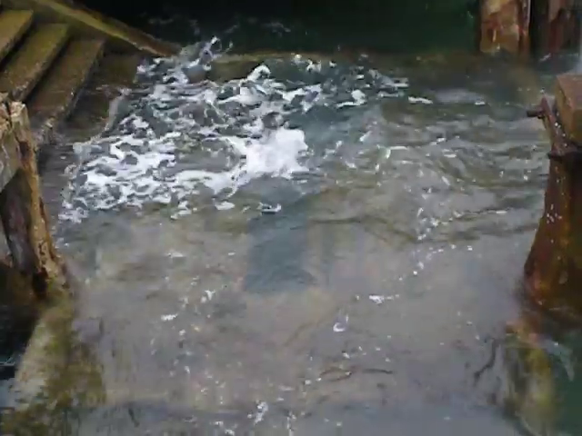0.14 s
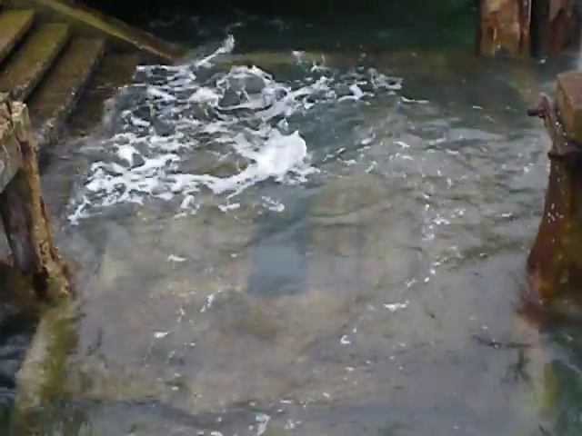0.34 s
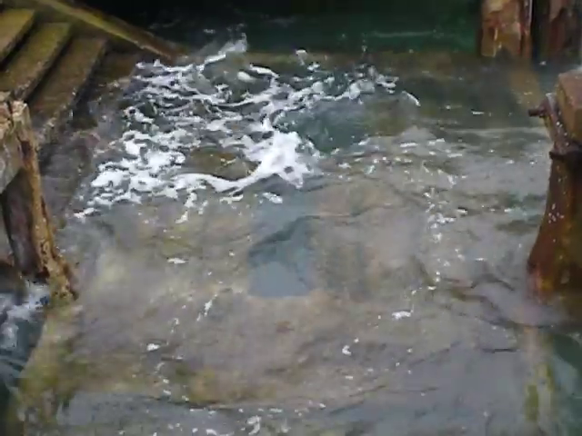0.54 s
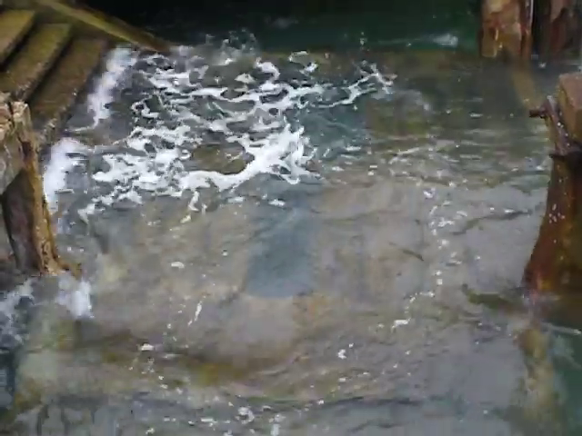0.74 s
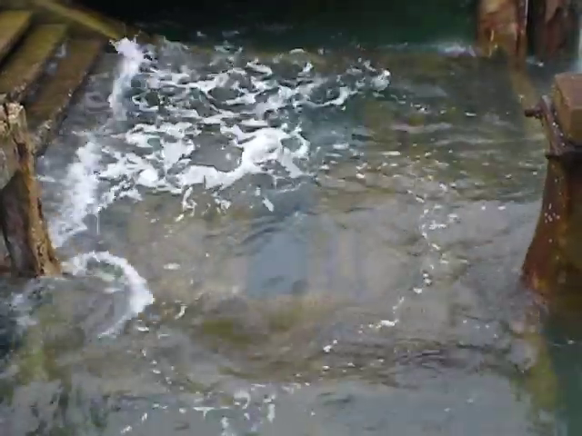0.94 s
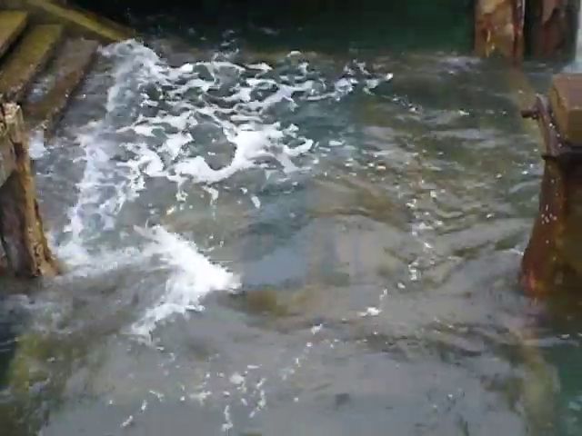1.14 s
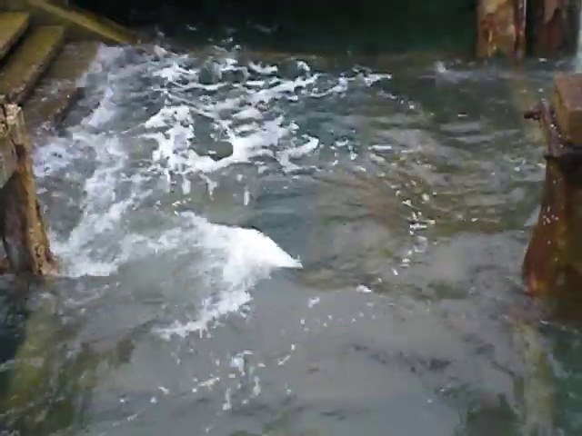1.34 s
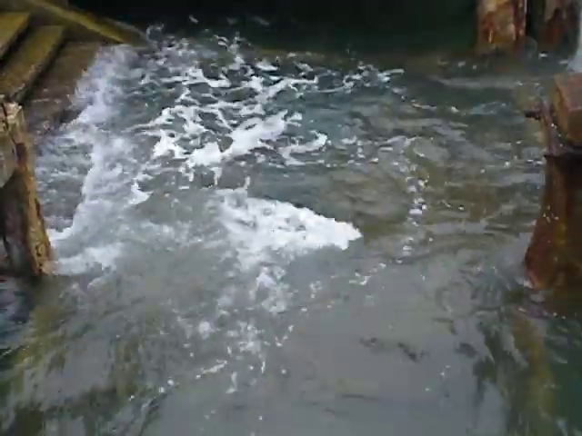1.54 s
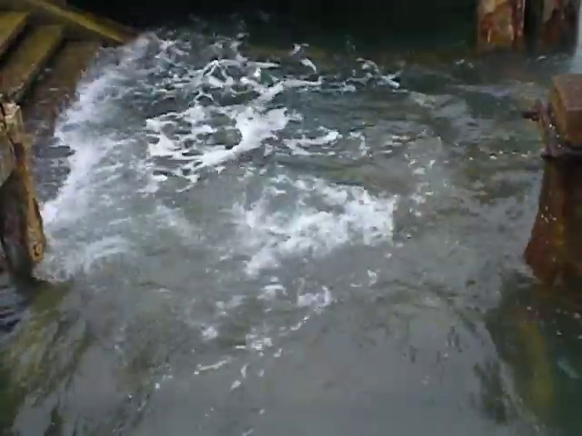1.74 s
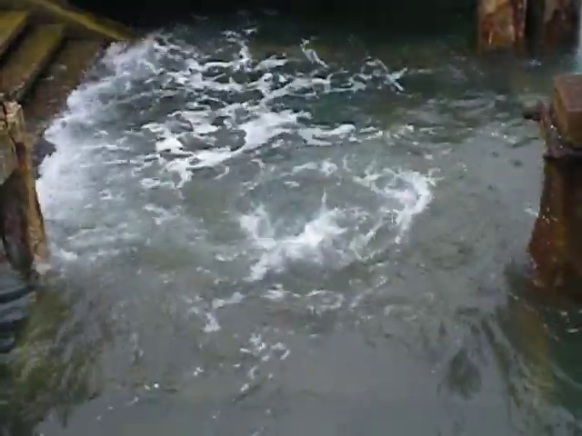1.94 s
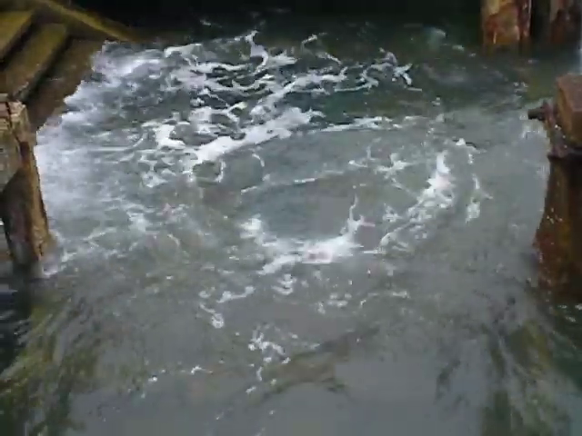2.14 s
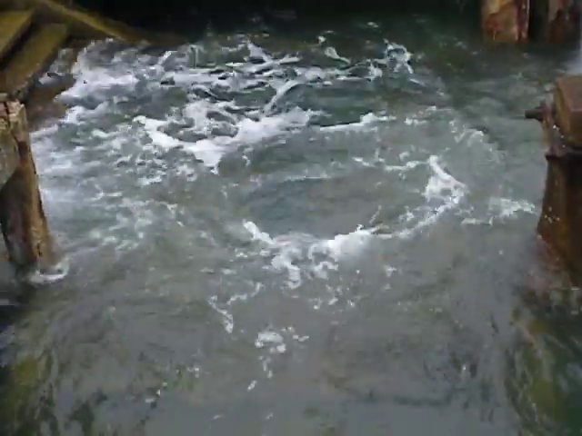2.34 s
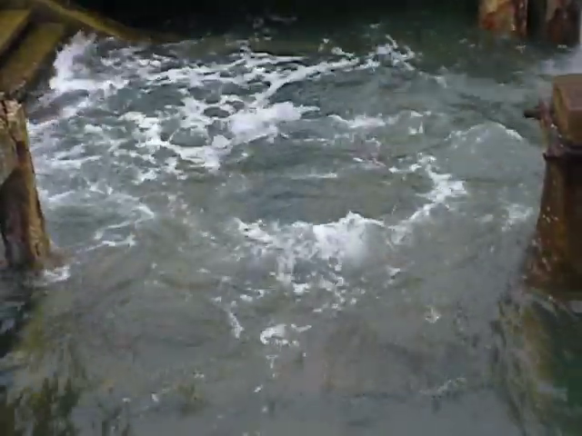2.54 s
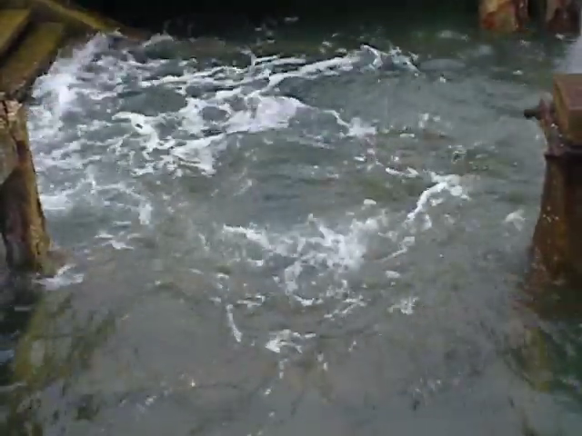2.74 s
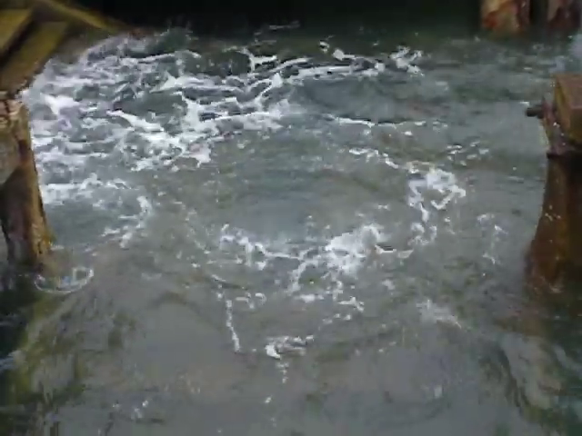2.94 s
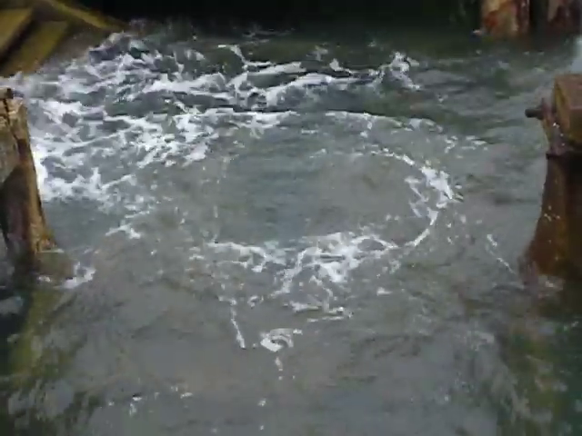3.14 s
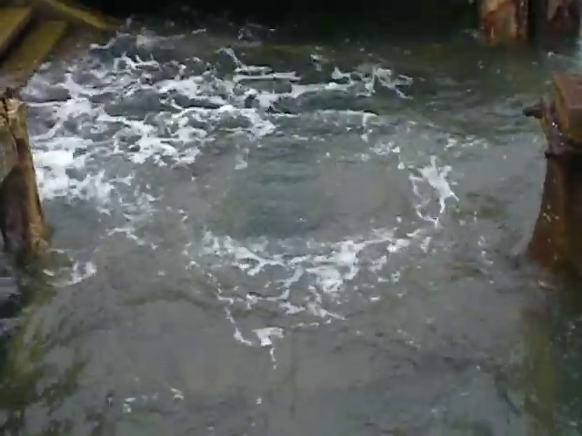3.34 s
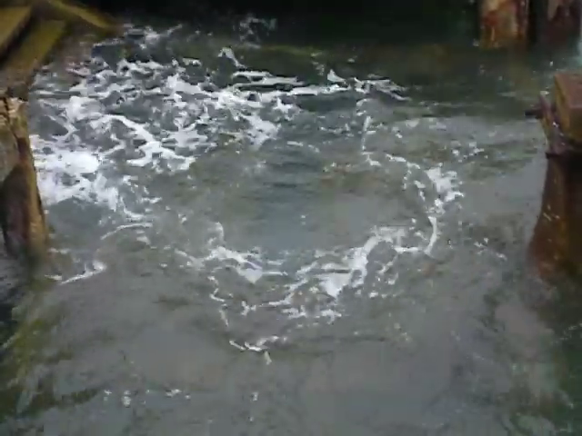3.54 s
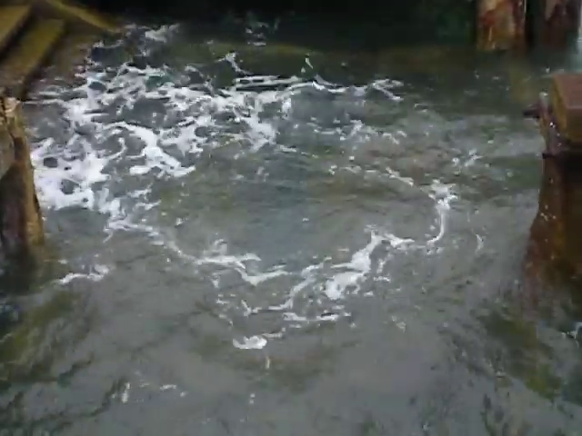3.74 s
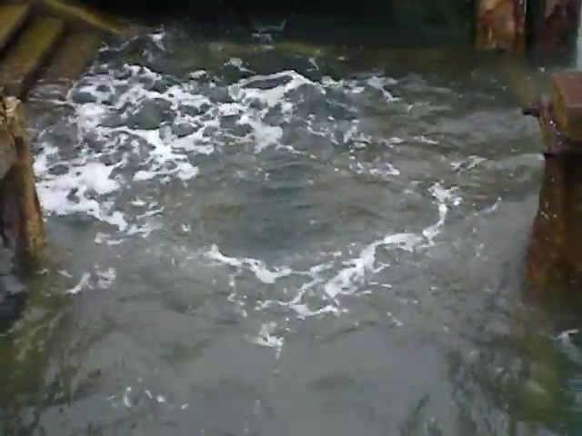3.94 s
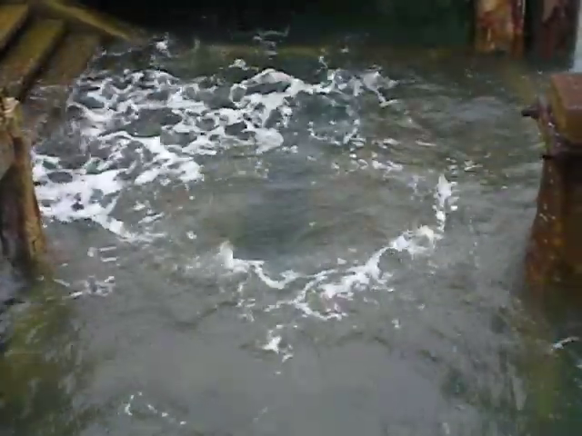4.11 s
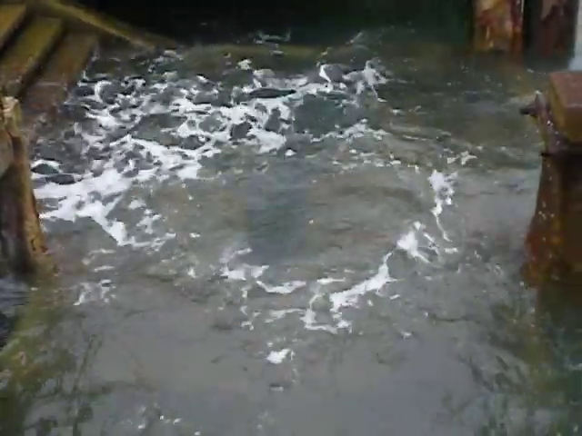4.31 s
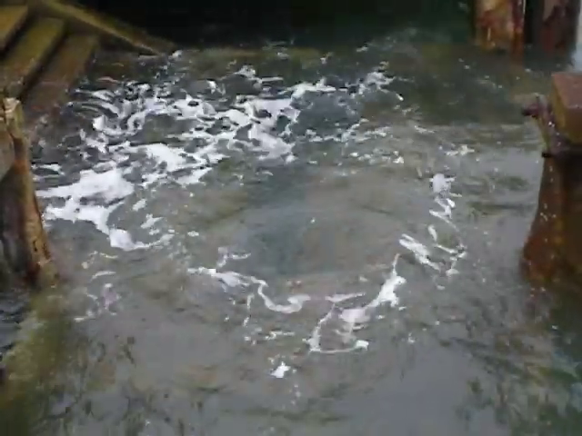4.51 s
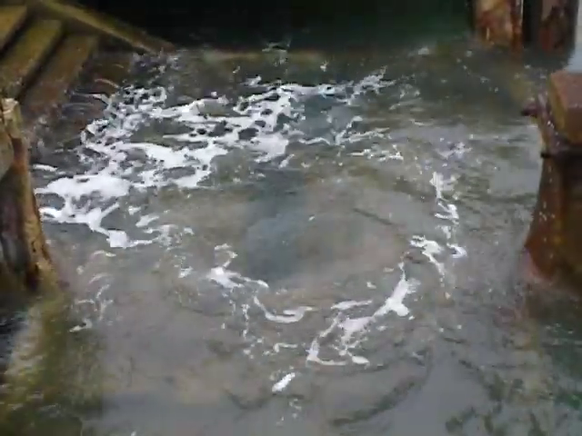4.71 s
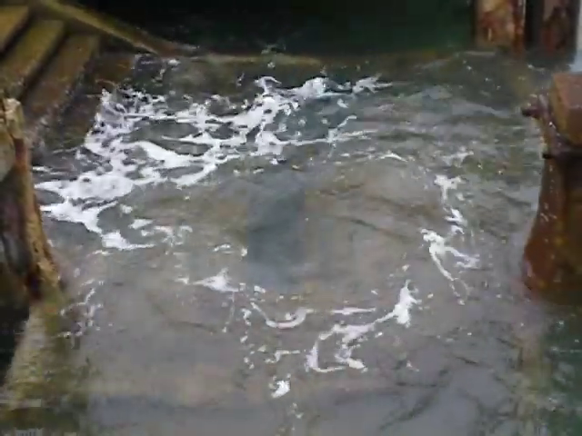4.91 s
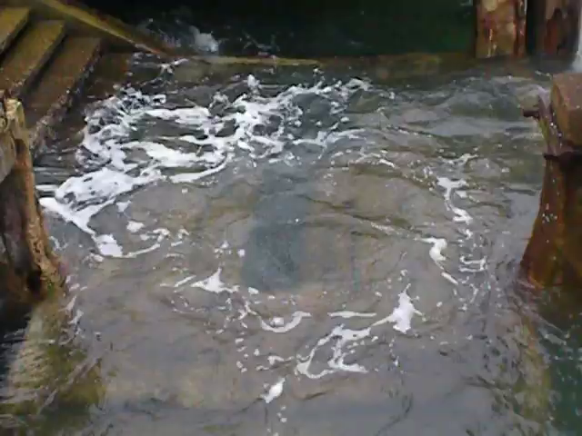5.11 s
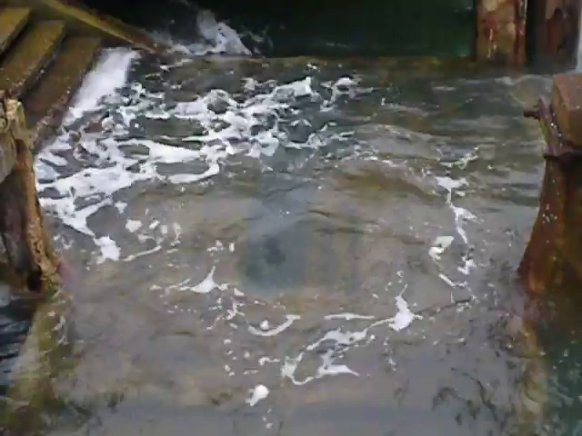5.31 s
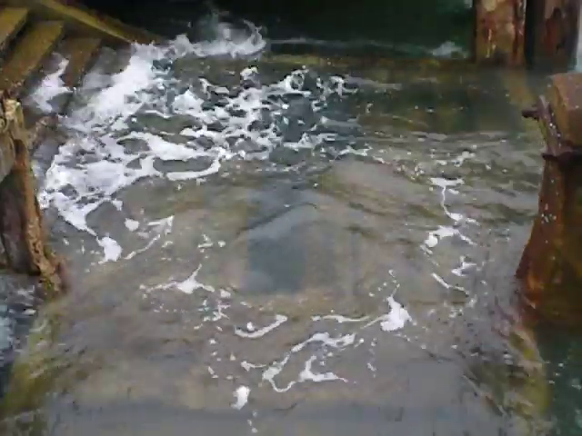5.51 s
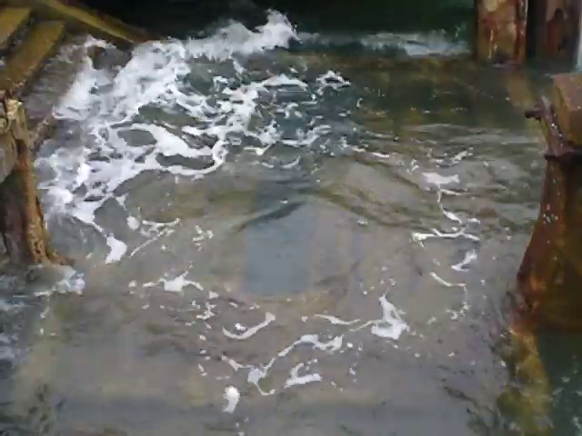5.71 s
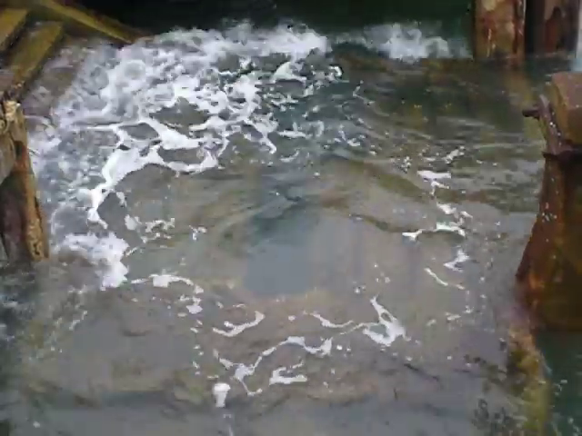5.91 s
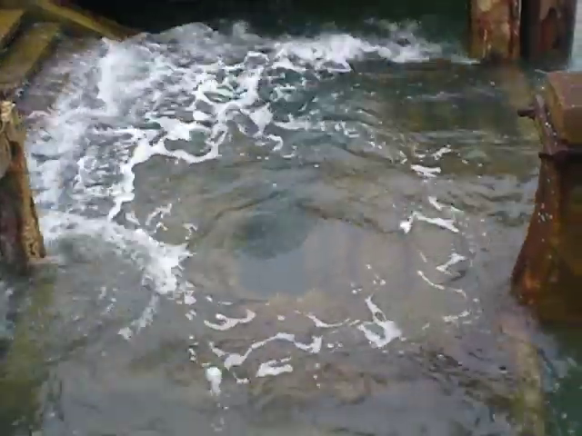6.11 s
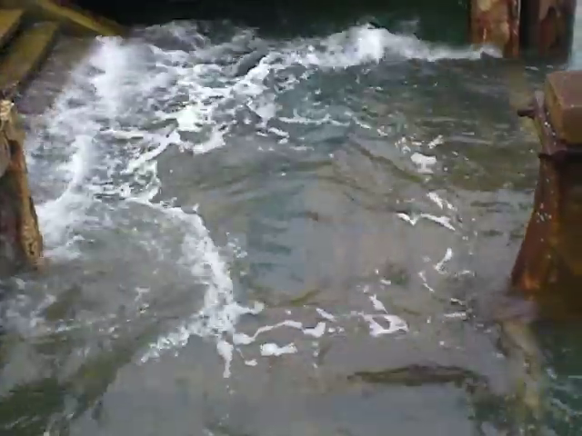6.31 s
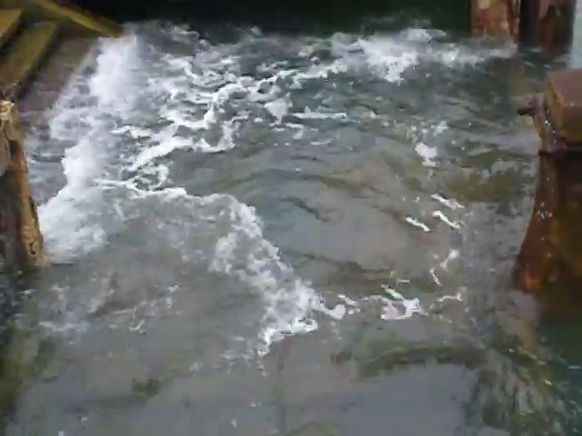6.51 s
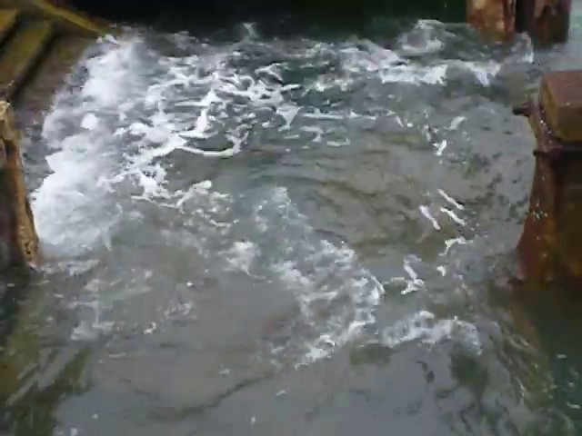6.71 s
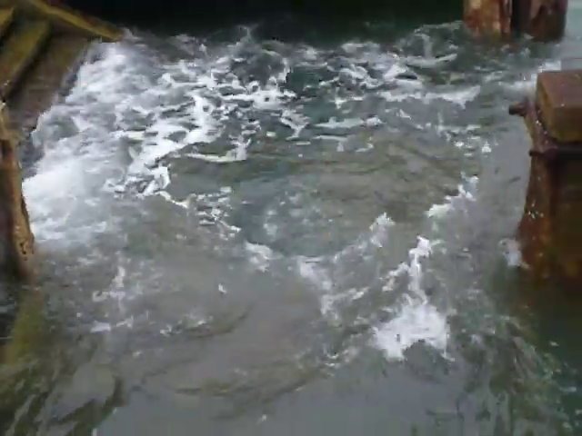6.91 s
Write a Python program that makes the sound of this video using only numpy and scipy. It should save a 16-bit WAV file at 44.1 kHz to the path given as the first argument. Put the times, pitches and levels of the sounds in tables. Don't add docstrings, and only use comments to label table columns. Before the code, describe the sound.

Close, dull-toned churning water hisses and fizzes in swelling waves around pilings, with gurgling air pockets, small splashes and two sharp clipped pops.

```python
import sys
import numpy as np
from scipy import signal
from scipy.fft import rfft, irfft
from scipy.io import wavfile
from scipy.ndimage import uniform_filter1d

SR = 44100
rng = np.random.default_rng(int(sys.argv[2]) if len(sys.argv) > 2 else 0)


def dump(signal):
    limited = np.clip(np.atleast_2d(signal).T, -1, 1)
    pcm = np.round(limited * 32767).astype(np.int16)
    wavfile.write(sys.argv[1], SR, pcm)


def gain_from_db(level_db):
    decades = np.asarray(level_db, float) / 20
    return 10 ** decades


N = 311346


def read(points, hz):
    f, value = np.transpose(points)
    return np.interp(np.log(hz + 1), np.log(f + 1), value)


def evened(x):
    return x / np.sqrt(np.mean(abs(x) ** 2) + 1e-20)


def add(mix, s, sound):
    part = mix[round(s * SR):][:len(sound)]
    part += sound[:len(part)]


def rush():
    layer_hz = [
        100,
        260,
        800,
        2400,
    ]
    # frequency in Hz, density in dB per Hz.
    foam_colour = [(18, -67), (30, -39.5), (48, -34.5), (188, -14), (383, -4.5), (499, -5), (637, -1.5),
                   (734, -3.5), (882, -1), (1250, -2.5), (1440, -8), (2390, -7), (2870, -11.5),
                   (3900, -25.5), (5070, -57), (8580, -120)]
    bubble_weight = .35
    bubbles = fizz(per_s=2500., spread_db=2.5, cycles=3.75, top_hz=3850)
    gurgle = fizz(per_s=120., spread_db=2.0, cycles=14.46, top_hz=1200, count=20)
    hiss = rng.standard_normal(N) * 2.18
    water = np.sqrt(bubble_weight) * (bubbles + gain_from_db(-9.0) * gurgle) + np.sqrt(1 - bubble_weight) * hiss
    hz, t, z = signal.stft(water, SR, nperseg=1024, noverlap=896)

    layers = layer_levels(t)
    layers -= 10 * np.log10(np.mean(gain_from_db(layers) ** 2, axis=1, keepdims=True))
    layers[0] = np.maximum(layers[0], -9.)
    index = np.arange(len(layer_hz))
    place = np.interp(np.log(hz + 1), np.log(layer_hz), index)
    blend = np.maximum(1 - abs(place[:, None] - index), 0)

    patches = rng.standard_normal((len(t), len(hz))).T
    patches = uniform_filter1d(patches, size=14, axis=0)
    patches = evened(uniform_filter1d(patches, size=14, axis=1))
    flicker = evened(uniform_filter1d(rng.standard_normal(len(t)), size=8))
    field_db = read(foam_colour, hz)[:, None] + blend @ layers + .5 * patches + 0.064 * flicker
    return gain_from_db(-11.) * signal.istft(z * gain_from_db(field_db), SR, nperseg=1024, noverlap=896)[1][:N]


def layer_levels(t):
    # time in seconds, level in dB.
    surge = [(0, -20.5), (.5, -22.5), (.78, -17.5), (.92, -18.5), (1.05, -17.5), (1.6, -18), (2.22, -21),
             (2.6, -18), (3.1, -20.5), (3.55, -24), (3.95, -21), (4.1, -23), (4.32, -17.5), (4.97, -21),
             (5.32, -16.5), (6.6, -17), (6.75, -18.5), (6.9, -17)]
    follow = [
        0.54,
        0.74,
        0.93,
        0.98,
    ]
    # centre in seconds, lift in dB,
    # length in seconds, depth from 0 (churn only) to 1 (slap only).
    heaves = [(0.101, 4, 0.22, .3), (0.301, 8.5, 0.17, .9), (.45, 8, .12, 0.8), (0.725, 3.5, .12, 1),
              (0.972, 3.5, 0.081, .1), (1.351, 14, 0.17, 0.5), (1.555, 17, .15, 0.6),
              (1.717, 14.5, .15, .75), (1.857, 17, 0.21, .65), (2.09, 13, 0.34, 0.8),
              (2.465, 22.5, 0.26, .6), (2.646, 10, .15, 0.5), (2.785, 16.5, .14, .6), (2.95, 15, .16, 0.6),
              (3.166, 9.5, 0.26, 0.8), (3.344, 4, 0.11, .6), (3.946, 5, .25, 0), (4.129, 5, 0.17, .2),
              (4.404, 1.5, 0.48, .1), (4.856, 2.5, .15, 1), (5.09, 9.5, 0.22, .75), (5.339, 8, 0.2, 0.7),
              (5.49, 9, 0.11, 0.8), (5.693, 9.5, .12, 0.8), (5.822, 6.5, 0.092, .8),
              (5.92, 10.5, 0.39, 0.7), (6.285, 10, 0.3, 0.7), (6.422, 11, 0.087, 0.8),
              (6.563, 2.5, 0.082, .1), (7.001, 4.5, .2, 1)]
    # centre in seconds, lift in dB, length in seconds.
    sheets = [(0.614, 2.5, 0.43), (0.809, 3, 0.1), (1.187, 0, 0.13), (1.443, 1, .4), (2.151, 0.5, 0.51),
              (2.512, 6, 0.06), (3.038, 2.5, 0.13), (4.558, 2, 0.34), (4.904, 2, 0.31), (5.552, 1.5, 0.18),
              (5.871, 2, 0.29), (6.202, 1, 0.24), (6.773, 0, 0.29)]
    # centre in seconds, drop in dB.
    lulls = [(.66, -2), (.91, -2.5), (1.19, -2.5), (2.33, 0), (2.48, -1.5), (2.68, -1.5), (4.6, 0),
             (5.21, -2), (5.275, -2.5), (5.425, -3), (5.51, -1.5), (5.634, -3), (5.8, -2), (6.07, -1.5),
             (6.38, -0.5), (6.5, 0)]
    lull_s = 0.051
    layers = np.outer(follow, uniform_filter1d(np.interp(t, *np.transpose(surge)), size=20))
    for s, db, length, depth in heaves:
        layers[:2] += np.outer([1.3 * depth, 1.25 * (1 - depth)], swell(t, s, db, length))
    for s, db, length in sheets:
        layers[3] += swell(t, s, db, length)
    for s, db in lulls:
        layers[2:] += swell(t, s, db, lull_s)
    return layers


def swell(t, s, db, length):
    return db * np.cos(np.pi * np.clip((t - s) / (1.65 * length), -.5, .5)) ** 2


def fizz(per_s, spread_db, cycles, top_hz, count=32):
    out = np.zeros(N)
    for hz in np.linspace(120, top_hz, count):
        chance, size = rng.random(N), rng.exponential(1, N)
        train = (chance < per_s / count / SR) * gain_from_db(spread_db * np.minimum(size, 5))
        grain = bubble(hz, cycles * (hz / 1000) ** 0.49, 0.13)
        out += signal.oaconvolve(train, grain / np.linalg.norm(grain))[:N]
    return evened(out)


def bubble(hz, cycles, glide):
    u = np.arange(int(2 * cycles / hz * SR)) * hz / SR / cycles
    shape = u * np.exp(1 - u / 0.29) / 0.35
    return shape * np.sin(2 * np.pi * cycles * u * (1 + glide * u / 2))


def splash_gain():
    # start in seconds, peak in dB.
    thrown = [(0.729, -5), (.87, -10), (1.018, -6), (1.08, -8.5), (1.111, -10), (2.506, -2), (2.559, -13),
              (2.709, -2.5), (2.75, -4), (2.839, -6.5), (3.968, -2), (5.1, -14), (5.289, -4.5),
              (5.36, -10.5), (5.46, -6), (5.565, -6), (5.87, -8), (6.459, -4)]
    t60_s, attack_s = 0.019, .003
    lift, t = np.zeros(N), np.arange(SR // 5) / SR
    for s, db in thrown:
        add(lift, s, gain_from_db(db + 2.5 - 60 * t / t60_s) * np.minimum(t / attack_s, 1))
    return 1 + lift


def bursts(rows, glide):
    out = np.zeros(N)
    for s, db, hz, cycles in rows:
        add(out, s, gain_from_db(db) * bubble(hz, max(cycles, 1), glide))
    return out


def gulps():
    # start in seconds, peak in dB, pitch in Hz, ring in cycles.
    pockets = [(0.876, -5, 915, 6), (0.994, -10.5, 897, 15), (1.039, -3.5, 973, 6), (1.084, -3.5, 657, 6.7),
               (1.309, -10, 740, 5.2), (1.636, -9, 727, 7), (3.955, -11.5, 479, 8), (2.408, -18.5, 856, 14),
               (2.508, -6, 868, 4.4), (2.624, -3, 796, 7.2), (2.752, -13.5, 414, 14), (4.294, -24, 785, 12),
               (4.449, -7, 1200, 4.7), (4.737, -8.5, 986, 6), (5.075, -18.5, 1252, 6),
               (5.102, -7.5, 935, 7.7), (5.288, -5.5, 1265, 4.2), (5.367, -11, 593, 8.3),
               (5.528, -3.5, 602, 5.5), (5.819, -15, 916, 7.8), (6, -10.5, 1214, 6), (6.136, -13, 385, 5.1),
               (6.277, -3, 1020, 4), (6.333, -8, 1130, 3.3), (6.423, -9.5, 619, 6), (6.459, -3.5, 626, 6),
               (6.562, -10, 1035, 6), (6.624, -6, 848, 9.5), (6.989, -10, 1046, 9.1), (7.042, -3, 885, 3.7)]
    return gain_from_db(-3.5) * bursts(pockets, 0.12)


def near_pops():
    # start in seconds, peak in dB, pitch in Hz.
    pops = [(0.264, -12.5, 2370), (0.9712, -13.5, 1588), (1.0202, -5.5, 1987), (1.1104, -7, 2200),
            (1.2083, -10.5, 2023), (1.7921, -13, 1424), (2.5108, -8.5, 2120), (2.5635, -5, 2314),
            (2.708, -3, 2310), (2.7397, -13, 1472), (2.897, -9.5, 2290), (3.255, -7, 2236),
            (4.4092, -9, 2194), (5.1743, -13, 2324), (5.424, -16, 1630), (5.6289, -12, 2015),
            (6.457, -8.5, 2020), (6.9269, -6.5, 1390), (7.0115, -13.5, 1583)]
    return gain_from_db(-2.5) * bursts([(*row, 4.3) for row in pops], 0.12)


def spray_ticks():
    # start in seconds, peak in dB.
    ticks = [(.2683, -33.5), (1.173, -29.5), (1.8574, -25), (2.3478, -26), (2.7804, -28), (5.2442, -28.5),
             (5.5077, -18.5), (6.2088, -22.5), (6.8388, -14), (6.8785, -10.5), (6.96, -17)]
    tick_hz, cycles = 3270, 6
    return gain_from_db(-2.5) * bursts([(s, db, tick_hz, cycles) for s, db in ticks], 0.12)


def post_slaps():
    # start in seconds, peak in dB, pitch in Hz.
    slaps = [(0.087, -26.5, 304), (1.446, -22, 277), (1.617, -20.5, 318), (1.675, -21, 276),
             (1.535, -15.5, 300), (1.85, -12, 218), (2.06, -17.5, 228.5), (2.156, -18, 221),
             (2.366, -17.5, 326), (2.591, -14, 272.5), (4.527, -25.5, 278), (5.021, -30, 268),
             (5.665, -22, 312), (5.944, -18.5, 318), (6.249, -17.5, 200), (6.402, -23.5, 293),
             (6.51, -13.5, 252)]
    return gain_from_db(-4) * bursts([(*row, 4.5) for row in slaps], .05)


def post_thuds():
    # start in seconds, peak in dB, pitch in Hz.
    thuds = [(0.699, -33, 124), (1.329, -36, 124), (1.52, -38.5, 94), (1.71, -38.5, 124),
             (1.841, -33.5, 105), (2.369, -30.5, 104.6), (2.432, -34.5, 97), (2.763, -40, 92),
             (2.931, -41.5, 124), (5.052, -35.5, 103.5), (6.439, -42.5, 124)]
    return gain_from_db(-0.5) * bursts([(*row, 2.9) for row in thuds], .05)


def overload(x):
    # centre in seconds, peak in dB, pitch in Hz, length in seconds.
    loud_pops = [
        (.77998, -1.2, 1500, .0013),
        (1.17335, .4, 1980, .0022),
    ]
    t = np.arange(N) / SR
    for s, db, hz, length in loud_pops:
        since = t - s
        window = np.cos(np.pi * np.clip(since / length - .03, -.5, .5))
        ring = np.cos(2 * np.pi * hz * since * (1 + 60 * since))
        x = x * (1 - .9 * window) + gain_from_db(db) * window ** 1.5 * ring
    return x


def scene():
    bubbles = near_pops() + spray_ticks() + gulps()
    blows = post_slaps() + post_thuds()
    return overload(rush() * splash_gain() + bubbles + blows)[None]


def band_limit(x):
    return signal.sosfilt(signal.butter(12, 15800, fs=SR, output="sos"), x)


def record(dry):
    sampling_hz, ceiling = 8000, .71
    z = rfft(dry)
    hz = np.arange(z.shape[1]) * SR / N
    half = round(sampling_hz / 2 * N / SR)
    z[:, half + 1:2 * half] = np.conj(z[:, half - 1:0:-1])
    z[:, 2 * half:] = 0
    z *= gain_from_db(read([(15, -17.5), (45, 0), (3850, -1), (4000, -6.5), (4200, -12), (4350, -23),
                   (4500, -38), (4700, -66.5), (5000, -140)], hz))
    x = np.clip(irfft(z, N), -ceiling, ceiling) - .0028
    return band_limit(x)


dry = scene()
out = record(dry)
dump(out)
```